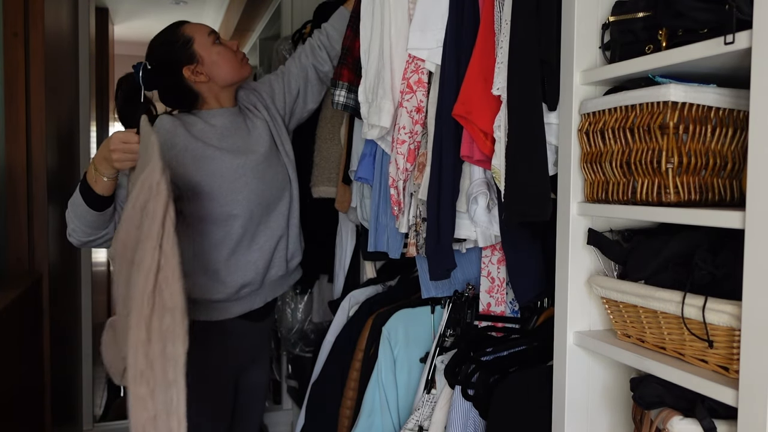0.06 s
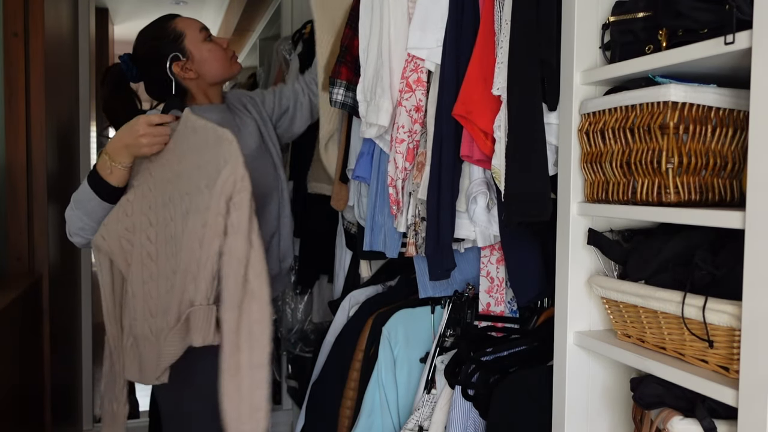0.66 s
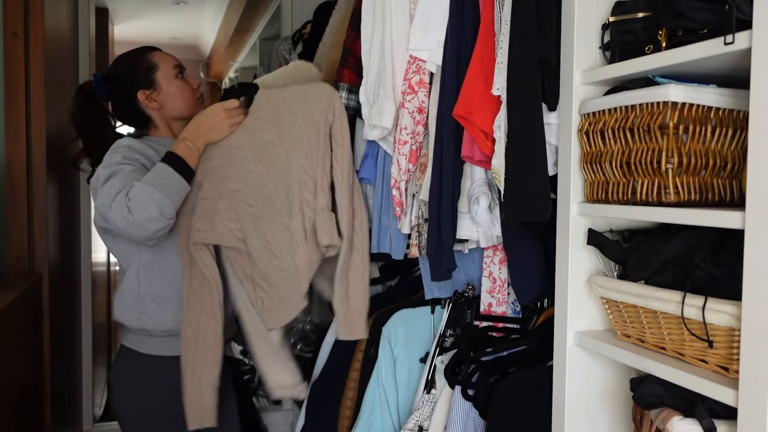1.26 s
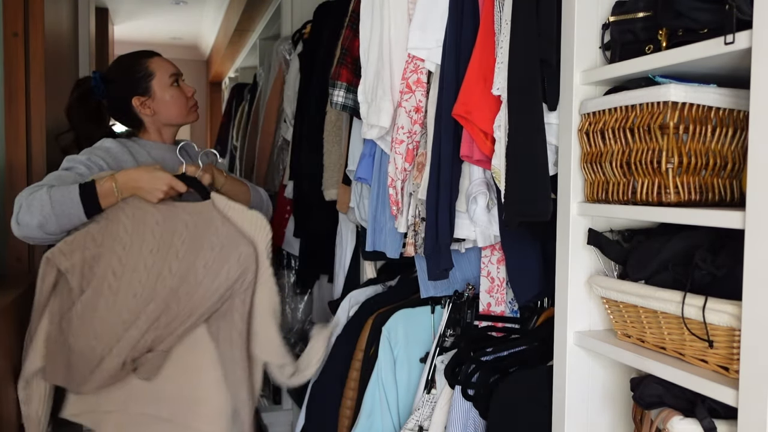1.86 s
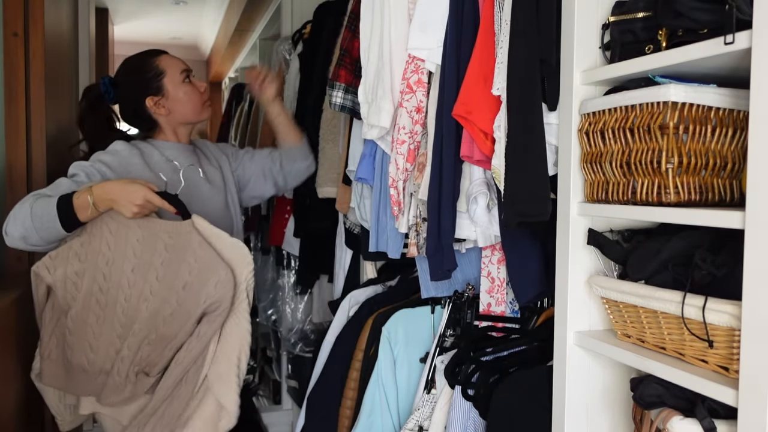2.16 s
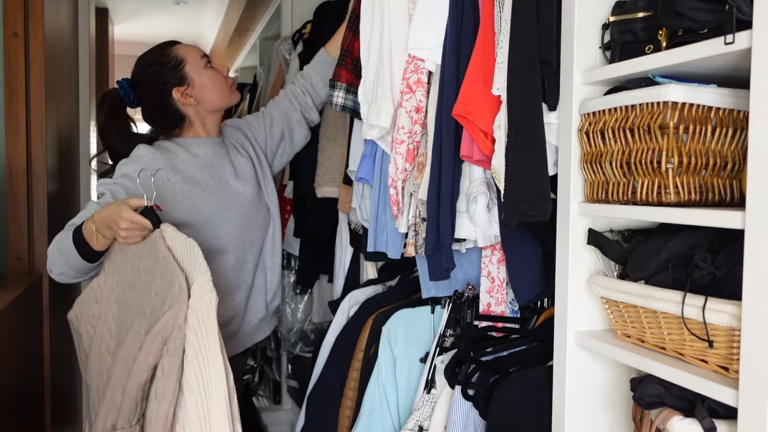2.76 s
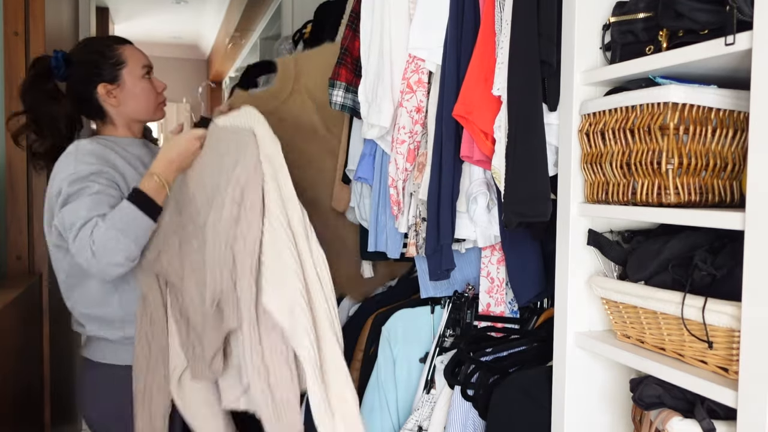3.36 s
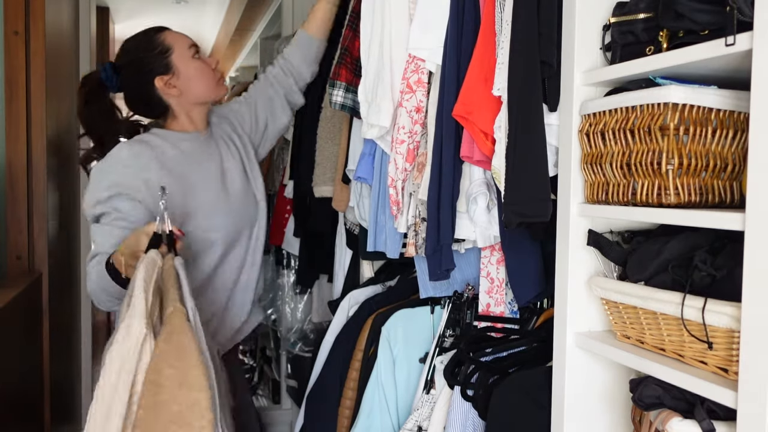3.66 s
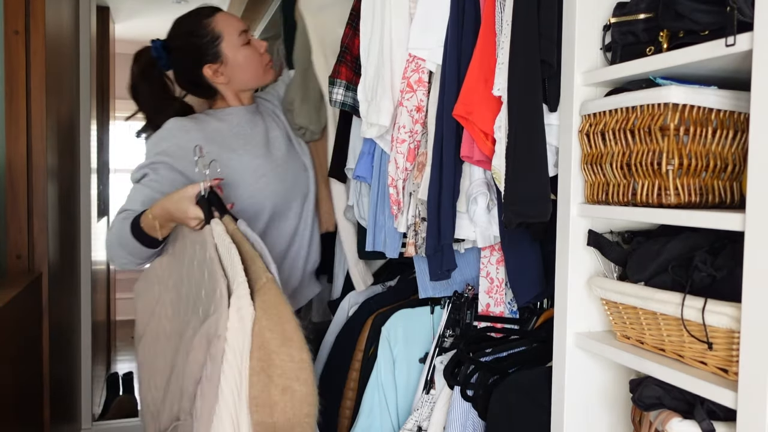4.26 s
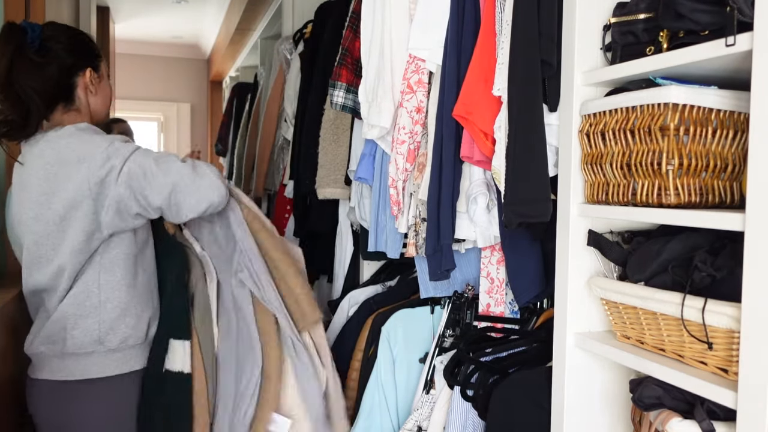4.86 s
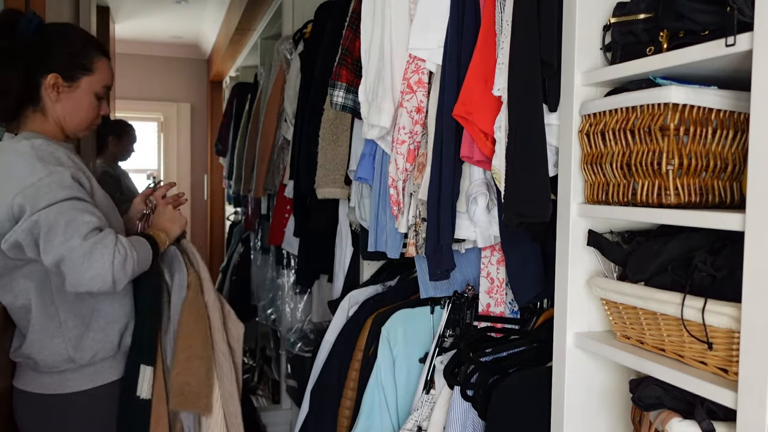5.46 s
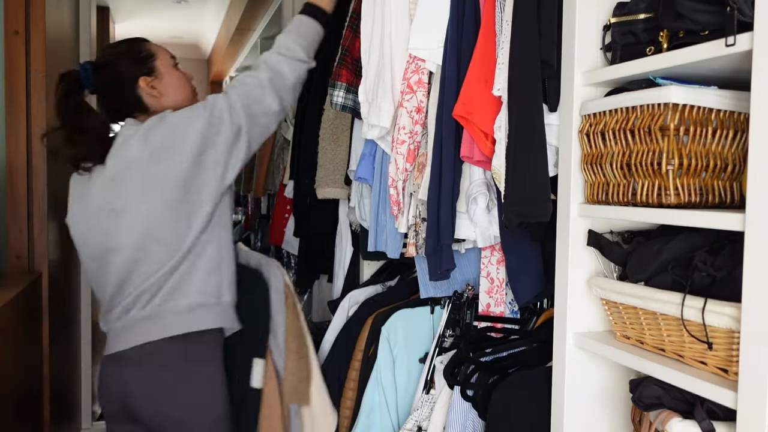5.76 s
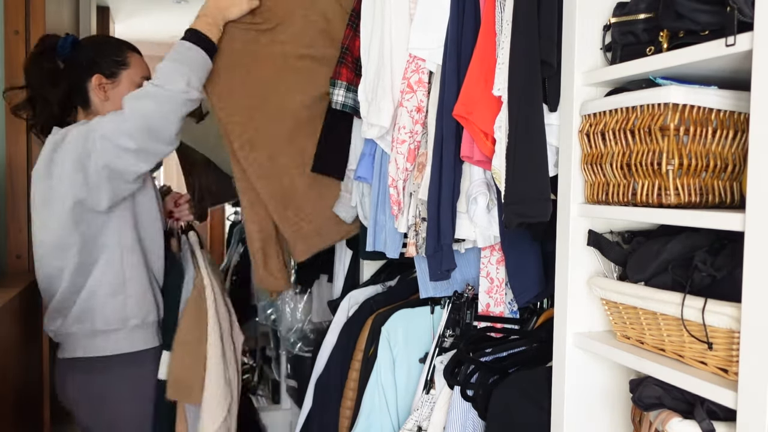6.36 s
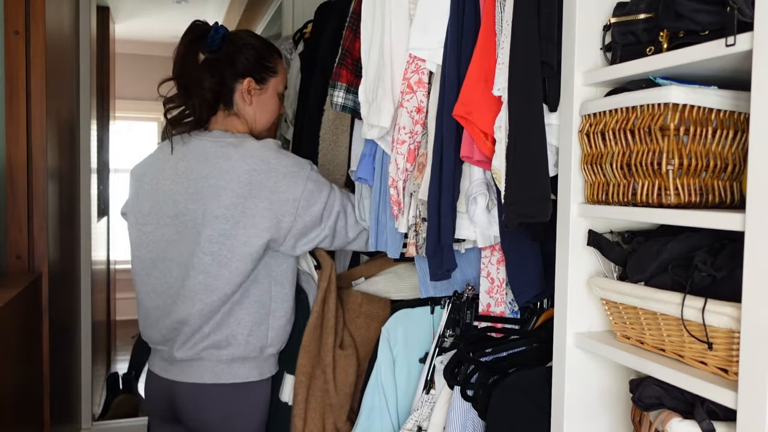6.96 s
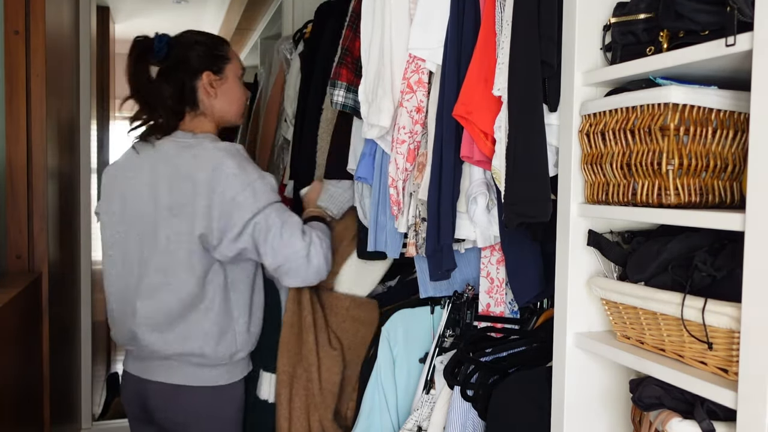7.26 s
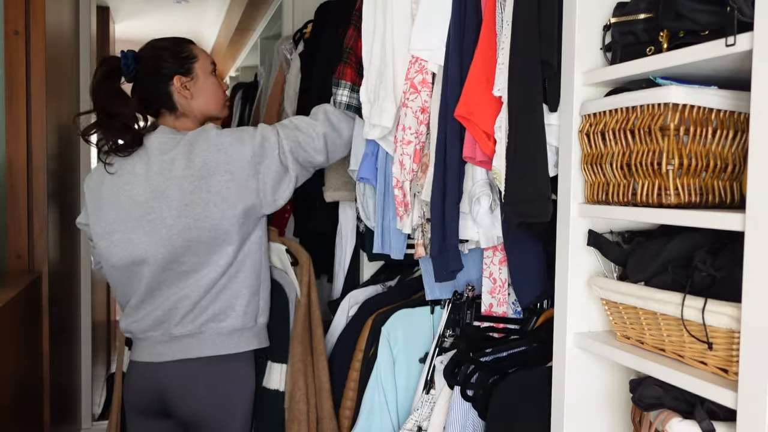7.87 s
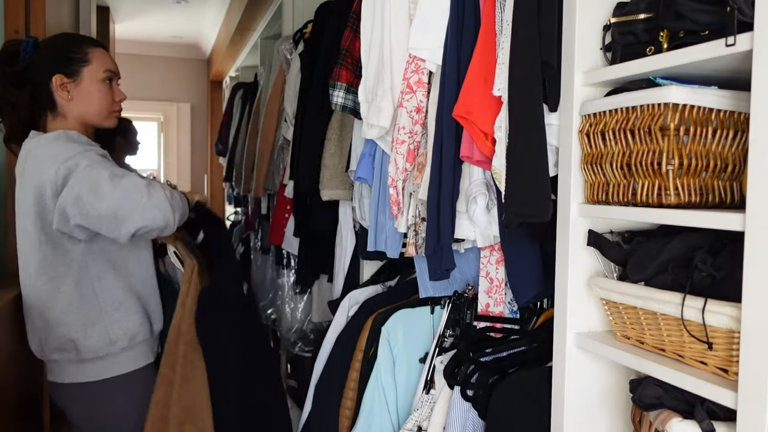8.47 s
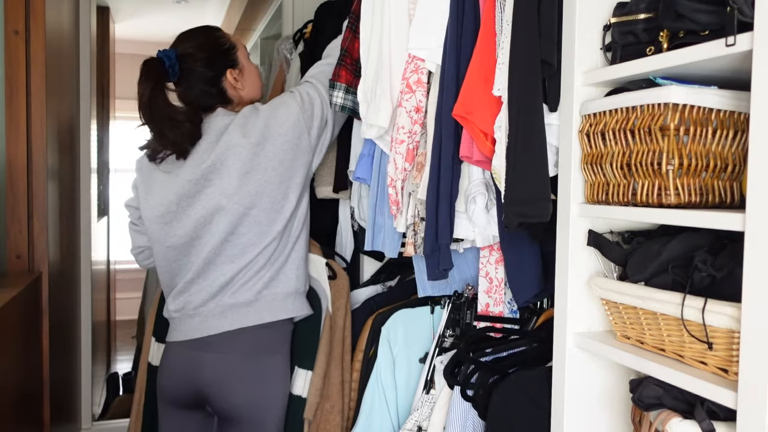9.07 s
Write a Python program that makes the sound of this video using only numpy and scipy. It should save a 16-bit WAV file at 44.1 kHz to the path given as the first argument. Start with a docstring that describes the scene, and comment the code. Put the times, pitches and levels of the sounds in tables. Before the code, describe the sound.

Over a faint, steady rush of air in a small room, garments brush together and hangers tick and knock at uneven intervals, heard from nearby. A short metallic scrape ends in a sharp clack. Later, a bunch of wire hooks gives a loud, quick, ringing rattle. Further clacks, a brief squeaky drag and a busier patch of clicks and rustling lead to a soft thump and a faint floor creak.

```python
"""A steady rush of ventilation fills a small room; cloth swishes and a wire hook ticks as garments are
taken off a closet rail one at a time. Friction makes the hooks scrape and the fabric rustle. Impacts
excite natural modes: hanger bodies clack together and, loudest of all, the gathered hooks snap past
each other. Steps and a flapping garment thud softly, the floor creaks, and the closet reverberates."""
import sys
import numpy as np
from scipy import signal
from scipy.fft import rfft, irfft, next_fast_len
from scipy.io import wavfile
from scipy.ndimage import uniform_filter1d, map_coordinates

SR = 44100
rng = np.random.default_rng(int(sys.argv[2]) if len(sys.argv) > 2 else 0)


def transcribe(u):
    """Save the signal u as a 16-bit wav file named by the first command-line argument.

    u: samples, shape (n,) or (channels, n), limited to [-1, 1]; the rate is SR.
    q: integer samples, one column per channel.
    """
    v = np.clip(np.atleast_2d(u).T, -1, 1)
    q = np.round(v * 32767).astype(np.int16)
    wavfile.write(sys.argv[1], SR, q)


N = 401856
SIZE = 2 ** 14  # samples in one impulse response
T = np.arange(SIZE) / SR
HZ = np.fft.rfftfreq(SIZE, 1 / SR)


def amp(db):
    """Amplitude ratio of a level in decibels."""
    return 10 ** (np.asarray(db) / 20)


def unit(x):
    """Normalisation to rms 1."""
    return x / np.sqrt(np.mean(np.abs(x) ** 2) + 1e-20)


def along(points, hz):
    """Interpolation of (Hz, value) points on a logarithmic frequency axis."""
    freqs, values = np.transpose(points)
    return np.interp(np.log(hz + 1), np.log(freqs), values)


def shape(points, hz=HZ):
    """Spectral envelope through (Hz, dB) points, with unit mean power."""
    return unit(amp(along(points, hz)))


def peaks(modes, hz=HZ):
    """Second-order resonances summed in power, with unit mean power."""
    power = sum(amp(db) ** 2 * (hz * width) ** 2 / ((centre ** 2 - hz ** 2) ** 2 + (hz * width) ** 2)
                for centre, width, db in modes)
    return unit(np.sqrt(power))


def steep(modes, hz=HZ):
    """Steep-skirted resonances, 12 dB down one half-width from the centre, with unit mean power."""
    return unit(sum(amp(db) / (1 + ((hz - centre) / width) ** 2) ** 2 for centre, width, db in modes))


def wobble(rate):
    """Smooth random modulation with `rate` knots a second."""
    knots = rng.standard_normal(int(N * rate / SR) + 4)
    return map_coordinates(knots, [np.arange(N) * rate / SR], order=2)


def swell(s, db, rise, fall, hold=0, sag=0):
    """Exponential envelope reaching db at time s; rise and fall in s per 10 dB, sag in dB per s."""
    t = np.arange(N) / SR - s
    ramps = np.maximum(-t, 0) / rise + np.maximum(t - hold, 0) / fall
    return amp(db - np.minimum(10 * ramps + sag * np.clip(t, 0, hold), 200))


def filtered(x, response):
    """Linear filtering: the spectrum is multiplied by a frequency response."""
    size = next_fast_len(N + SIZE)
    return irfft(rfft(x, size) * response(np.fft.rfftfreq(size, 1 / SR)), size)[..., :N]


def stereo(pair, side_db):
    """Left and right as the sum and difference of a mid and a side signal."""
    mid, side = pair[0], amp(side_db) * pair[1]
    return np.array([mid + side, mid - side])


def rush(response, side_db):
    """Spectrally shaped stereo noise of rms 1."""
    return unit(stereo(filtered(rng.standard_normal((2, N)), response), side_db))


def causal(gain):
    """Minimum-phase response of a given magnitude: the ringing follows the blow."""
    cepstrum = irfft(np.log(gain + 1e-6))
    return np.exp(rfft(2 * cepstrum * (np.arange(SIZE) < SIZE // 2) - cepstrum * (T == 0)))


def add(track, s, sound, pan_db=0):
    """Superposition of a sound at time s; positive pan_db favours the left."""
    start = round(s * SR)
    track[:, start:start + SIZE] += (sound * amp([[pan_db / 2], [-pan_db / 2]]))[:, :N - start]


# The closet's decay. Each row: frequency in Hz, time to fall 60 dB in seconds.
REVERB_TIMES = [(200, 0.34), (600, 0.39), (1400, .24), (4000, 0.27), (9000, 0.23), (15000, 0.15)]

def closet(build_s=0.0023):
    """Reverberation: a diffuse tail of energy 1 in which each frequency decays at its own rate."""
    hz, t, spectra = signal.stft(rng.standard_normal((2, SIZE)), SR, nperseg=256)
    decay = amp(-60 * t / along(REVERB_TIMES, hz)[:, None])
    tail = signal.istft(spectra * decay, SR, nperseg=256)[1][:, :SIZE]
    return unit(stereo(tail * (1 - np.exp(-T / build_s)), side_db=-9)) / np.sqrt(SIZE)


def blow(gain, contact_s, rise_s, chatter_db, room_db, side_db, window_s=0.0069):
    """Impact excitation: an impulse and its chatter ring object and closet; peak short-term rms is 1."""
    chatter = stereo(rng.standard_normal((2, SIZE)), side_db) * amp(-60 * T / contact_s)
    onset = 1 - np.exp(-T / rise_s)  # cloth between the parts softens the onset
    force = (T == 0) + amp(chatter_db) * unit(chatter * onset) / np.sqrt(SIZE) + amp(room_db) * closet()
    sound = irfft(rfft(force) * causal(gain))
    power = uniform_filter1d(sound.mean(0) ** 2, int(window_s * SR), mode="constant")
    return sound / np.sqrt(power.max())


# Spectra of the duct's hiss and low rush. Each row: frequency in Hz, relative level in dB.
DUCT_HISS = [(200, -51), (500, -24), (700, -14.5), (870, 2), (1050, -2.5), (1250, 4), (1450, -7),
             (1650, -3.5), (2000, -15), (3000, -19), (6000, -23), (15500, -31.5)]
DUCT_RUSH = [(15, -76), (25, -45), (91, -33.5), (108, -17), (291, -18.5), (325, -16), (354, -6.5),
             (448, -11.5), (576, -10), (662, -11.5), (700, 4.5), (910, -30), (1540, -120)]
# Likeness of left and right. Each row: frequency in Hz, correlation from -1 to 1.
COHERENCE = [(60, 0.71), (180, 0.22), (550, -0.21), (1650, -0.22), (4970, -0.023), (15000, 0.69)]
# The motor's tone. Each row: frequency in Hz, rms level in dB.
MOTOR_HUM = [(118.4, -101)]

def ventilation():
    """Flow noise: air rushing in a duct reaches the ears partly correlated, over a faint motor hum."""
    def mid_side_gains(hz):
        colour = amp(-59) * shape(DUCT_HISS, hz) + amp(-80) * shape(DUCT_RUSH, hz)
        angle = np.arccos(along(COHERENCE, hz)) / 2
        return colour * [np.cos(angle), np.sin(angle)]

    air = stereo(filtered(rng.standard_normal((2, N)), mid_side_gains), side_db=0)
    t = np.arange(N) / SR
    hum = sum(amp(db) * np.sqrt(2) * np.sin(2 * np.pi * hz * t) for hz, db in MOTOR_HUM)
    return air * amp([[1.2], [-1.2]]) + hum


# The board's groans. Each row: peak time in seconds, level in dB, rise and fall in seconds per 10 dB.
CREAKS = [(8.658, -59.5, .09, .027), (8.718, -52.5, .018, .037)]
# Spectrum of a creak. Each row: frequency in Hz, relative level in dB.
CREAK_SPECTRUM = [(30, -45), (120, -34), (220, -20.5), (340, 6), (460, -4), (900, -35), (3000, -60)]

def floorboard():
    """Forced vibration: a board groans under shifting weight."""
    groan = sum(swell(*row) for row in CREAKS)
    return groan * rush(lambda hz: shape(CREAK_SPECTRUM, hz), side_db=-17) * amp(1.5 * wobble(40))


# Soft low thuds: feet landing and a garment flapping. Each row: start in seconds, level in dB.
SOFT_THUDS = [(1.52, -70), (3.61, -72), (4.63, -69), (8.711, -45)]
# Their spectrum. Each row: frequency in Hz, relative level in dB.
SOFT_THUD_SPECTRUM = [(30, -38), (100, -28), (200, -21), (320, 6), (420, -0.5), (550, 1.5), (750, -16),
                      (2000, -53.5)]

def soft_thuds():
    """Soft impact: a yielding contact excites mainly low frequencies."""
    track = np.zeros((2, N))
    for s, db in SOFT_THUDS:
        thud = blow(shape(SOFT_THUD_SPECTRUM), 0.11, 0.0035, chatter_db=19.5, room_db=10, side_db=-30)
        add(track, s, amp(db) * thud)
    return track


# Garments brushing past each other.
# Each row: fastest moment in seconds, level in dB, rise and fall in seconds per 10 dB.
SWISHES = [(0.03, -69, .3, .22), (0.65, -66, .12, .35), (1.18, -61.5, .35, .65), (1.9, -56, .2, .17),
           (2.35, -66, .35, .45), (3.1, -67, .15, .35), (4.02, -74, .2, .3), (4.74, -66, .11, .45),
           (5.09, -52.3, .16, .19), (5.6, -56.5, .4, .28), (6.42, -67, .25, .3), (6.72, -64, .2, .24),
           (7.76, -56.5, .11, .2), (8.635, -48.3, .18, .17), (9.02, -65, .2, .7)]
# Spectra of rubbing fibres and flapping folds. Each row: frequency in Hz, relative level in dB.
FIBRE_SPECTRUM = [(60, -48), (400, -27), (1000, 1.5), (2000, -0.5), (4000, 0), (6000, -4.5), (9000, -12.5),
                  (15000, -24.5)]
FOLD_SPECTRUM = [(30, -23), (100, -19), (200, -9), (340, -0.5), (600, 0), (1200, -5.5), (2500, -23)]

def cloth(still_db=-82, flap_exponent=0.33):
    """Friction noise: fibres catch in small grains; the soft flapping grows more slowly than the swish."""
    swish = np.sqrt(amp(still_db) ** 2 + sum(swell(*row) ** 2 for row in SWISHES))
    flap = amp(-80) * (swish / amp(-60)) ** flap_exponent
    fibres = rush(lambda hz: shape(FIBRE_SPECTRUM, hz), side_db=-5.5) * amp(0.89 * wobble(90))
    folds = rush(lambda hz: shape(FOLD_SPECTRUM, hz), side_db=-7.5) * amp(1.8 * wobble(25))
    return swish * fibres * amp([[.8], [-.8]]) + flap * folds


# A hook slides, lifts off, turns and is dragged a short way. Each stroke: moment of full grip in
# seconds, level in dB, rise in seconds per 10 dB, hold in seconds, sag in dB per second.
LONG_SLIDE = (1.496, -45.5, .013, .274, 50)
LIFT_OFF = (1.787, -47, .016, .078, 110)
TWIST = (2.932, -50.8, .009, .026, 70)
SHORT_DRAG = (7.728, -49.5, .022, .068, 70)
# Spectra of rubbed rail, rubbed wire and shaken rail. Each row: frequency in Hz, relative level in dB.
RAIL_HISS = [(290, -58), (500, -34), (826, -6), (990, -15), (1330, -3.5), (1590, -7), (2520, -2.5),
             (3110, -12.5), (4400, -4), (6060, -22), (14000, -44)]
WIRE_HISS = [(200, -49), (800, -10), (1500, 0.5), (4000, 4), (6000, -0.5), (8000, -7), (12000, -16),
             (16000, -31)]
RAIL_RUMBLE = [(20, -6), (45, 0), (70, -9), (130, -22), (400, -60)]
# The rail's modes. Each row: frequency in Hz, bandwidth in Hz, relative level in dB.
RAIL_MODES = [(1732, 11, 4.5), (1980, 50, -3), (2430, 31, -4.5), (2590, 28, -2), (2910, 37, -4.5),
              (3690, 34, -1), (4020, 27, -6), (4320, 21, -3), (4530, 47, -1.5)]
# Squeaks of a dragged and a turning hook. Each row: frequency in Hz, half-width in Hz, relative dB.
DRAG_MODES = [(3280, 400, 0.5), (3830, 310, -4), (5500, 600, -9), (6620, 470, -0.5), (9300, 800, -11)]
TWIST_MODES = [(3330, 1000, -9), (4410, 310, 0), (6100, 2100, -10.5), (9150, 380, -3.5)]

def scrape(s, db, rise, hold, sag):
    """Envelope of sliding friction: a hook grips quickly, fades as it slows, and stops."""
    return swell(s, db, rise, fall=0.014, hold=hold, sag=sag)


def sliding_hooks(rumble_db=-36, room_db=-4.5):
    """Stick-slip friction excites the rail and the wire; the closet carries the sound on."""
    rail = lambda hz: shape(RAIL_HISS, hz) * np.hypot(1, amp(-7.5) * peaks(RAIL_MODES, hz))
    wire = lambda hz: shape(WIRE_HISS, hz)
    turning = lambda hz: steep(TWIST_MODES, hz)
    dragged = lambda hz: np.hypot(steep(DRAG_MODES, hz), amp(-6) * wire(hz))
    slide = scrape(*LONG_SLIDE) * rush(rail, side_db=-15) * amp(1.3 * wobble(130))
    lift = scrape(*LIFT_OFF) * rush(wire, side_db=-12) * amp(2.1 * wobble(140))
    twist = scrape(*TWIST) * rush(turning, side_db=-10) * amp(2 * wobble(140))
    rumble = amp(rumble_db) * rush(lambda hz: shape(RAIL_RUMBLE, hz), side_db=-20)
    drag = scrape(*SHORT_DRAG) * (rush(dragged, side_db=-12) * amp(2 * wobble(170)) + rumble)
    friction = slide + lift + twist + drag
    return friction + amp(room_db) * signal.fftconvolve(friction, closet(), axes=1)[:, :N]


# Hooks touching the rail. Each row: start in seconds, level in dB, lower and upper ring in Hz,
# upper band in dB relative to the lower, click in dB relative to the lower ring.
TICKS = [(0.4131, -41.5, 3830, 8270, 2, -7), (0.4907, -48.5, 3900, 7600, -3.5, 1),
         (0.9612, -52.5, 2740, 7360, -29, -18), (1.3101, -55.5, 4820, 7820, -20, 3),
         (1.5544, -52, 4530, 9600, 0, 2), (1.9457, -58, 3040, 9300, 5, -6),
         (1.9932, -48, 2680, 7440, -6, -1), (2.182, -57.5, 2650, 9120, -3.5, -7),
         (2.24, -46, 4070, 10300, 1, 0), (3.151, -52, 3000, 7990, -19, -5),
         (4.5492, -40, 4190, 8400, -8, 1), (4.9804, -59.5, 4700, 7330, -17, -1),
         (5.0397, -52.5, 3230, 7310, -8, -1), (5.7571, -43, 4770, 7070, -4, 7),
         (5.9163, -51, 5830, 9740, 0.5, 0), (7.7172, -51.5, 3240, 9250, -2, -4),
         (7.8026, -39.5, 6300, 7000, -20, 3), (8.2492, -57, 3830, 8550, -5.5, -7.5),
         (8.332, -46, 2800, 10000, -5.5, -4), (8.4163, -46.5, 2590, 7000, 3, -7),
         (8.4544, -49, 3930, 7000, -4, 1), (8.5697, -50, 3130, 7220, -21, -4),
         (8.723, -44, 4950, 7100, -14, 1), (8.7804, -50.5, 3570, 9000, -2, -4)]
# Spectra of the wire's broad click and its treble. Each row: frequency in Hz, relative level in dB.
CLICK_SPECTRUM = [(60, -51), (400, -36), (900, -18), (2300, -14), (3200, -2), (5500, -0.5), (7000, -7),
                  (10000, -26), (15000, -38)]
TREBLE_SPECTRUM = [(200, -70), (3000, -30), (6000, 0), (8000, 2), (10500, 2), (13500, -6), (16000, -17)]

def ticking_hooks(mode_ratio=1.4, low_width_hz=420, high_width_hz=650, spacing_hz=330):
    """Bending modes: a struck hook rings at a low pair and a high one, over a click with weak modes."""
    track = np.zeros((2, N))
    for s, db, low_hz, high_hz, high_db, click_db in TICKS:
        ripple = map_coordinates(rng.standard_normal(256), [HZ / spacing_hz], mode="mirror")
        weak_modes = amp(3.5 * ripple)
        low_ring = steep([(low_hz, low_width_hz, 0), (mode_ratio * low_hz, low_width_hz, -4)])
        high_ring = steep([(high_hz, high_width_hz, 0)])
        low = unit(np.hypot(low_ring, amp(click_db) * shape(CLICK_SPECTRUM) * weak_modes))
        high = unit(np.hypot(shape(TREBLE_SPECTRUM) * weak_modes, amp(-2.5) * high_ring))
        gain = np.hypot(low, amp(high_db) * high)
        tick = blow(gain, 0.032, 0.00074, chatter_db=10.5, room_db=8.5, side_db=-10.5)
        add(track, s, amp(db) * tick, pan_db=1.2)  # the rail lies a little to the left
    return track


# Hangers colliding. Each row: start in seconds, level in dB, thud and crack in dB relative to the
# clack, main resonance in Hz, spectral tilt in dB per octave.
KNOCKS = [(1.1656, -52, -15, -14, 1800, 0), (1.2227, -49, -7, -21, 1420, 0.5),
          (1.8801, -24.5, -25, -24.5, 2230, 1), (1.9797, -42.5, -20, -11, 1410, -1),
          (2.047, -43.5, -19, -11, 1400, -5), (2.3556, -48, -10, -3, 910, 4),
          (2.5817, -53, -10, -15, 845, -5.5), (3.7814, -34, -26, -38, 1270, 0.7),
          (3.8776, -45.3, -28, -15, 4700, 6.5), (4.1365, -54, -15, -20, 834, -6),
          (5.0515, -42.5, -8, -18, 1830, 4.5), (5.4264, -39.5, -8, -10, 2860, 5.5),
          (5.5174, -52, -10, -12, 1380, 3.5), (6.55, -40, -27, -19, 1540, -4.5),
          (6.5723, -38.5, -4, -13, 1570, 5), (6.5982, -34, -20, -9, 760, -2),
          (7.5406, -42, -6.5, -14, 1596, -1.5), (7.88, -46, -12, -12, 1030, -0.5),
          (8.4028, -39.5, -29, -18, 1270, 0), (8.5587, -42, -19, -26, 2590, 6.5),
          (8.6535, -45.5, -16, -18, 3900, 2)]
# Modes of a hanger body. Each row: frequency in Hz, bandwidth in Hz, relative level in dB.
BODY_MODES = [(1093, 16, -2.5), (1250, 19, 0), (1462, 50, -4.5), (2230, 46, -2), (2638, 22, -0.5),
              (3120, 16, -10.5), (3236, 31, -3), (4150, 39, -8), (4290, 32, -6)]
# Spectra of the three parts of a knock. Each row: frequency in Hz, relative level in dB.
CLACK_SPECTRUM = [(60, -70), (250, -38), (600, -15), (900, -2.5), (1300, 1), (1800, -1.5), (2500, -2),
                  (3400, -4), (4400, -9), (5800, -25.5), (9000, -43), (15000, -57)]
THUD_SPECTRUM = [(30, -45), (100, -30.5), (220, -27.5), (360, -2.5), (480, -4.5), (680, 1.5), (1000, -3),
                 (2000, -53)]
CRACK_SPECTRUM = [(200, -73), (2000, -27.5), (4000, 0.5), (6000, -1), (8000, -7.5), (10500, -18),
                  (15000, -24)]

def hanger_bodies(width_hz=600, ring_db=-7):
    """Impact: the thud of a clothed hanger, the clack of its arms and a contact crack add in power."""
    track = np.zeros((2, N))
    arms = unit(shape(CLACK_SPECTRUM) * np.hypot(1, amp(-13.5) * peaks(BODY_MODES)))
    for s, db, thud_db, crack_db, ring_hz, tilt in KNOCKS:
        tilted = unit(arms * amp(tilt * np.log2((HZ + 100) / 2000)))
        ring = steep([(ring_hz, width_hz, 0)]) * np.minimum(HZ / ring_hz, 1) ** 2
        clack = unit(np.hypot(tilted, amp(ring_db) * ring))
        thud = amp(thud_db) * shape(THUD_SPECTRUM)
        crack = amp(crack_db) * shape(CRACK_SPECTRUM)
        gain = np.sqrt(clack ** 2 + thud ** 2 + crack ** 2)
        knock = blow(gain, 0.042, 0.0049, chatter_db=17, room_db=19.5, side_db=-18)
        add(track, s, amp(db) * knock, pan_db=0.7)
    return track


# Gathered hooks slipping past each other. Each row: start in seconds, ping and rattle levels in dB.
SNAPS = [(5.576, -24, -43.5), (5.604, -32.5, -55), (5.6226, -11.3, -27.8), (5.6316, -19.5, -36.5),
         (5.652, -20.5, -43.5), (5.698, -34.5, -42)]
# The ping's modes and the rattle's spectrum. Each row: frequency in Hz, relative level in dB.
PING_MODES = [(4750, -25), (5450, 0), (9150, -12.5)]
RATTLE_SPECTRUM = [(60, -63), (400, -46.5), (900, -20), (3200, -15), (4000, -4.5), (5200, -3), (6100, -9.5),
                   (6800, -10), (8300, -14), (9150, -6), (10000, -13.5), (13000, -15), (16000, -19)]

def snapping_hooks(rise_s=0.00044, room_db=-7):
    """Damped free vibration: a sprung hook lets go, pings, is stilled by the hand; neighbours rattle."""
    track = np.zeros((2, N))
    envelope = (T / rise_s) ** 2 * np.exp(2 - 2 * T / rise_s)
    ping = envelope * sum(amp(db) * np.sin(2 * np.pi * hz * T) for hz, db in PING_MODES)
    for s, ping_db, rattle_db in SNAPS:
        room = (T == 0) + amp(room_db) * closet()
        add(track, s, amp(ping_db) * irfft(rfft(ping) * rfft(room)), pan_db=4.5)
        rattle = blow(shape(RATTLE_SPECTRUM), 0.046, 0.001, chatter_db=14, room_db=12, side_db=-5)
        add(track, s, amp(rattle_db) * rattle, pan_db=2)
    return track


def scene():
    """Superposition: the pressures of all sources add."""
    hangers = hanger_bodies() + ticking_hooks() + snapping_hooks() + sliding_hooks()
    return hangers + cloth() + floorboard() + soft_thuds() + ventilation()


def record(dry):
    """Band limiting: an ideal low-pass filter removes everything above 15850 Hz."""
    return filtered(dry, lambda hz: hz < 15850)


dry = scene()
out = record(dry)
transcribe(out)
```